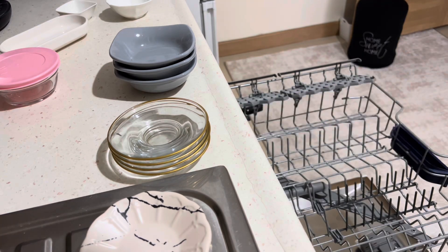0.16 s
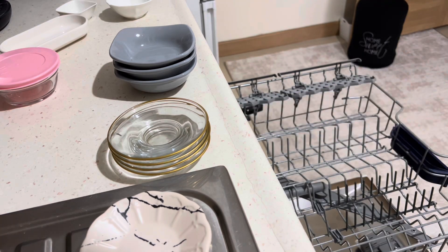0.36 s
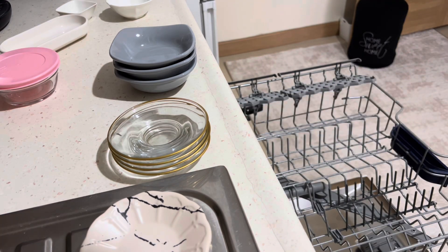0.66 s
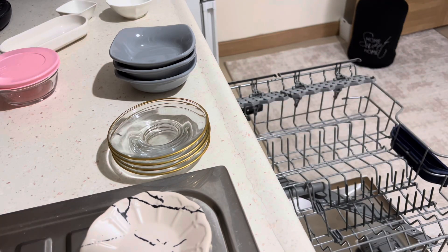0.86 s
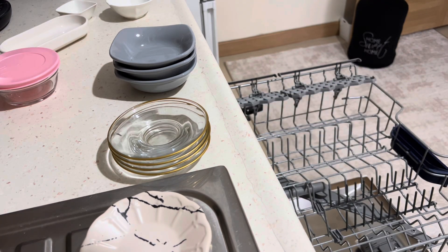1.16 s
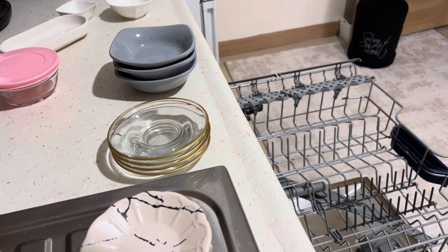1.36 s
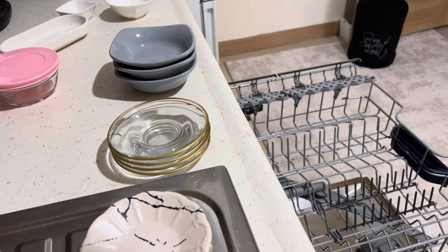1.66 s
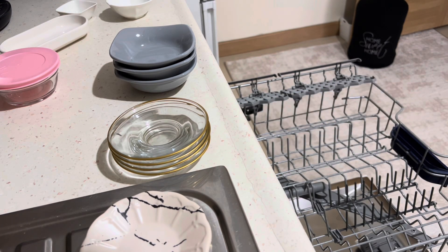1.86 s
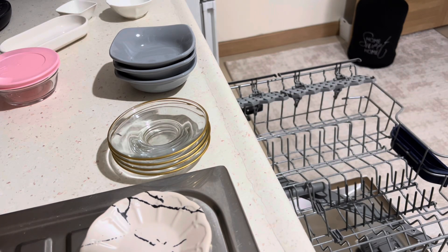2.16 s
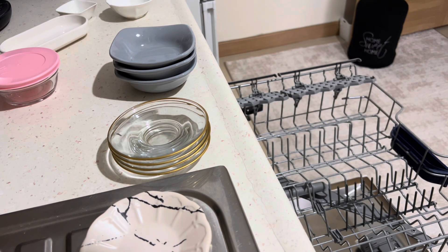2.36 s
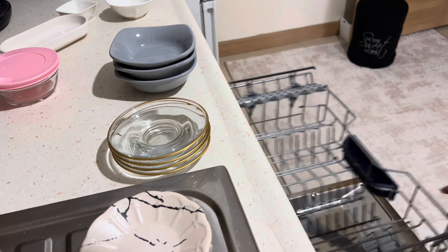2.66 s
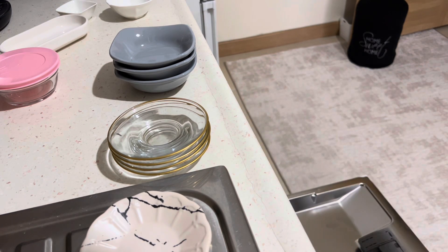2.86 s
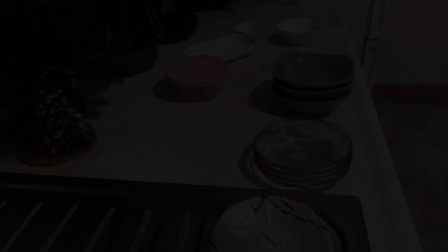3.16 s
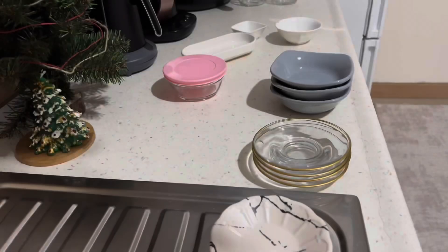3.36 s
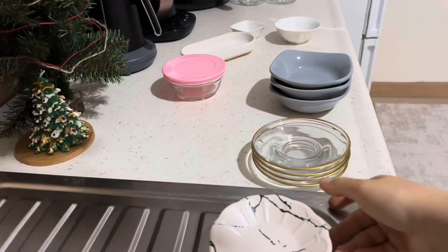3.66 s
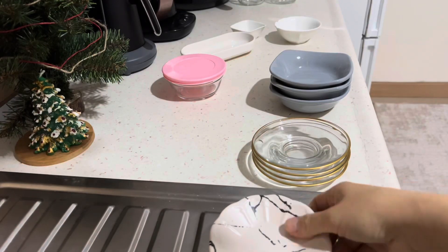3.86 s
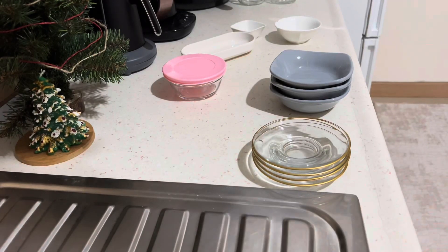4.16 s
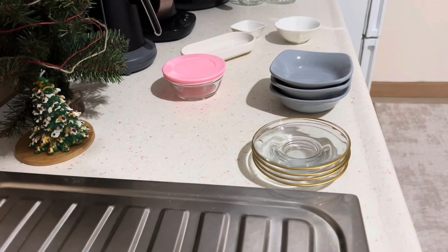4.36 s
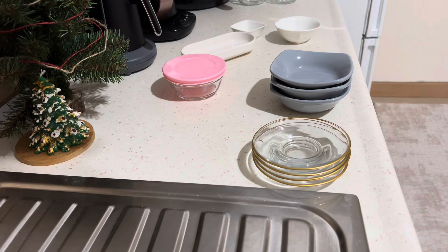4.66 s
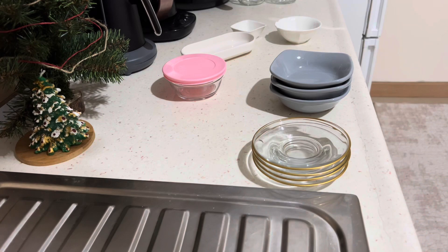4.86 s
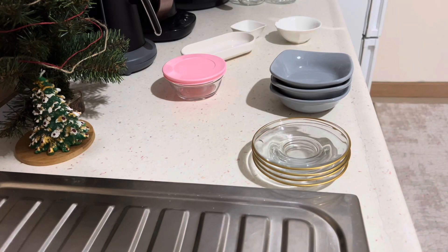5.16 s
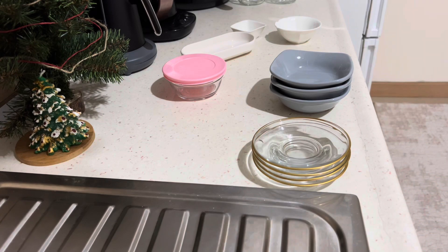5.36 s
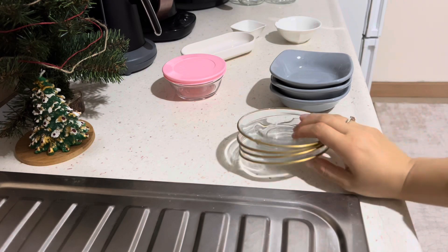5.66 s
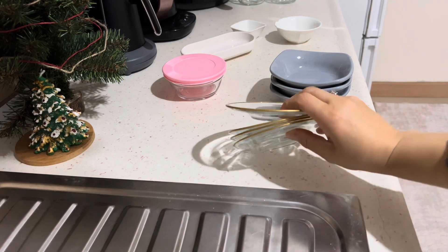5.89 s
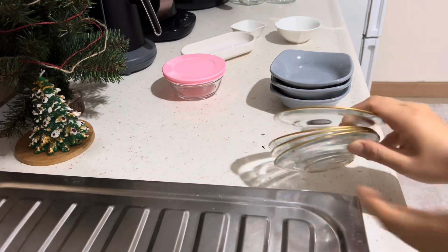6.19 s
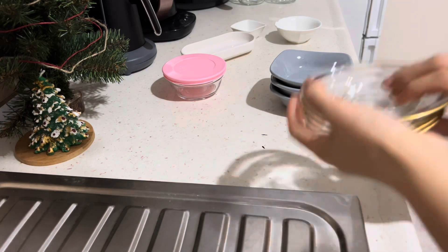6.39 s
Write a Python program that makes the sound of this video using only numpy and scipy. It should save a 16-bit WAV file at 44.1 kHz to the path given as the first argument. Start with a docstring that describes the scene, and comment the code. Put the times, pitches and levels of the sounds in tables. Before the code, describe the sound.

Close in a small hard kitchen over a faint low hum, a dishwasher's wire rack rattles in with loud, ringing metallic bursts. The door swings up with a soft rumble and thuds shut. After an abrupt cut, china plates knock and scrape on a steel drainer, then glass saucers clink and slide on a stone counter. Phone-like stereo pickup, short bright reverberation, no voice.

```python
"""Impact and friction in a small hard kitchen

A dishwasher's wire rack is shoved in and clatters, and its door swings up and thuds shut. After a cut, china
plates are lifted off a steel drainer and glass saucers slide and clink on a stone counter. Impacts are bursts
of noisy force that excite dense and clear modes; friction is uneven noise coloured by the body.
The room adds a diffuse tail over an unsteady hum, heard through the two microphone ports of a phone."""
import sys
import numpy as np
from scipy import signal
from scipy.fft import rfft, irfft
from scipy.io import wavfile
from scipy.ndimage import uniform_filter1d

SR = 44100
rng = np.random.default_rng(int(sys.argv[2]) if len(sys.argv) > 2 else 0)


def master(y):
    """Save y as 16-bit WAV."""
    cut = np.clip(np.atleast_2d(y).T, -1, 1)
    pcm = np.round(cut * 32767)  # scale
    wavfile.write(sys.argv[1], SR, pcm.astype(np.int16))


N = 287973
BLOCK = 1 << 14  # samples given to one blow

# Impacts, levels ahead of room and phone: (time [s], peak level at 1-6 kHz [dB],
# level below 1 kHz relative to that peak [dB], pitch favoured by the contact [Hz], chatter before decay [s])
RACK_BLOWS = [(0.8055, -8, -19.5, 2250, 0.02), (0.886, -20, -12, 2080, 0.0044),
              (0.897, -2, -53, 5050, 0.0038), (0.9083, -6, -21, 3500, 0.016),
              (0.9949, -10.5, -26, 5010, 0.013), (1.0197, -18, -14, 5180, 0.011),
              (1.1172, -22, -43, 1530, 0.005), (1.1787, -19.5, -19.5, 1984, 0.0052),
              (1.238, -35, -12, 1510, 0.003), (1.2917, -30.5, -17.5, 2200, 0.0032),
              (1.4641, -17, -19.5, 2520, 0.0025), (1.493, -13.5, -16, 2560, 0.015),
              (1.6065, -2.5, -33, 1500, 0.024), (1.6374, -3.5, -15, 2598, 0.014),
              (1.7948, -5.5, -10.5, 1700, 0.0082), (1.8250, -7, -8.5, 5680, 0.0098),
              (1.8520, -2.5, -16.5, 5570, 0.022), (1.8995, -8.5, -13.5, 1770, 0.011),
              (2.16, -48.5, -13, 3630, 0.014)]
DOOR_BLOWS = [(2.7742, -18.5, 3.5, 193, 0.035), (2.7974, -28, 3, 185, 0.0063),
              (2.935, -25, -0.5, 123, 0.0059), (2.9458, -13, 14, 154, 0.014),
              (3.1639, -25, -2, 2770, 0.0054)]
PLATE_BLOWS = [(3.9128, -8, -12, 1450, 0.0085), (3.928, -6, 3, 3980, 0.017),
               (4.3106, -34.5, -21, 2500, 0.028), (4.349, -11, -39, 7470, 0.0059),
               (4.386, -23, -51, 3350, 0.0091), (4.4703, -26.5, -25, 5600, 0.0044),
               (4.4865, -9, -46, 8630, 0.0043), (4.5005, -7.5, -52, 3540, 0.0026),
               (4.5643, -11.5, -42, 3274, 0.001), (4.5947, -11.5, -58, 2510, 0.0044),
               (4.8204, -6, -16.5, 1660, 0.011), (4.8846, -5.5, -49.5, 1310, 0.0015),
               (4.8994, -13.5, -20.5, 3860, 0.016), (4.934, -18.5, -27.5, 7040, .004),
               (4.9562, -17, -41, 1404, 0.0045), (4.9865, -27, -21, 3900, 0.0026),
               (5.0400, -26.5, -21.5, 2470, .003), (5.061, -15, -14.5, 1320, 0.008),
               (5.124, -33.5, -10, 1500, .003)]
GLASS_BLOWS = [(5.5513, -31, -4.5, 1520, 0.066), (5.6236, -22.5, -30, 5100, 0.019),
               (5.676, -4.5, -32, 6800, 0.0052), (5.6978, -2.5, -24.5, 7200, 0.0082),
               (5.7107, -4.5, -19, 7700, 0.0015), (5.8291, -13, -13.5, 3400, 0.0064),
               (5.914, -25.5, -5, 7240, 0.0026), (6.335, -23, -38, 5450, 0.014),
               (6.353, -23.5, -34, 8700, 0.0018), (6.4094, -7.5, -59, 8600, 0.001),
               (6.493, -25, -43, 5300, 0.014)]

# Rolling and sliding strokes: (start of full loudness [s], swell [s], hold [s], fade [s],
# level at 1-6 kHz [dB], relative level below 1 kHz [dB], relative level above 6 kHz [dB]);
# levels are at full loudness, for bands of unit rms, ahead of room and phone
RACK_ROLL = [(.106, 0.036, 0.0046, 0.04, -55.5, -29, 1), (.75, 0.045, 0.013, 0.13, -69, 5.5, -20),
             (1.04, 0.0063, 0.0039, 0.37, -39, -9.5, -3.5), (1.59, 0.15, 0.03, 0.0046, -43, -6, -0.5),
             (2.22, 0.043, 0.58, 0.051, -60.5, -12, -26)]
DOOR_SWING = [(2.575, 0.032, 0.12, 0.16, -53.5, 18.5, -15), (2.765, 0.14, 0.0022, 0.0038, -38.5, 9.1, -4),
              (2.87, 0.058, 0.059, 0.0043, -47, 15.8, -2), (3.02, 0.0046, .005, 0.14, -35, 4.6, -14.5)]
PLATE_SLIDE = [(3.732, 0.059, .005, 0.035, -57, -4, -4.5), (3.865, 0.0051, 0.012, 0.072, -47.5, -1.5, 2),
               (3.61, 0.0035, 0.12, 0.12, -73.5, -8, 14.5), (4.9, 0.0027, 0.019, 0.14, -19, -12.5, -11),
               (5.17, 0.26, 0.0039, 0.043, -34.5, -8, -23.5)]
GLASS_SLIDE = [(5.52, 0.0053, 0.02, 0.069, -60.5, 12.5, -10), (5.94, 0.027, 0.035, 0.14, -43, -1.5, -14),
               (6.09, 0.021, 0.061, 0.02, -43, 4.1, -29), (6.18, 0.093, 0.12, 0.022, -37, 5.9, -11.5)]
SWELL_DB = 20  # middle-band change over one swell or fade time

# Clear modes of each body when struck: (frequency [Hz], relative level [dB], decay by 60 dB [s])
RACK_MODES = [(1480, -8, .08), (1776, -2, .14), (2089, -6, .06), (2513, -6, .03), (3330, -8, .025),
              (4982, 0, .17), (5127, -4, .2), (5454, -2, .14), (5572, 0, .19), (5755, -3, .13)]
DOOR_MODES = [(154, 3, .2), (196, -1, .25), (221, -5, .25), (323, -12, .2), (616, -9, .15), (720, -10, .15)]
PLATE_MODES = [(323, -16, .1), (720, -20, .07), (1450, -6, .025), (3330, -5, .04), (3830, -3, .06),
               (4086, 3, .1), (7300, -3, .06), (9160, -3, .07), (12330, 0, .05), (12800, 2, .06),
               (13340, 0, .04)]
GLASS_MODES = [(690, -14, .06), (1550, -10, .03), (2300, -4, .05), (3400, -4, .05), (5250, -6, .08),
               (6580, -1, .1), (7219, 0, .06), (13230, -3, .06)]

# Dense modes blurred into a colour: (frequency [Hz], relative spectral level [dB per Hz])
RACK_BODY = [(80, -38.5), (192, -3.5), (797, -27.5), (1470, 2), (4700, -0.5), (6250, -2.5), (13700, -11)]
DOOR_BODY = [(60, -47), (151, 0.5), (230, -4.5), (390, -14.5), (720, -13), (1100, -26), (4730, -23),
             (13400, -34.5)]
PLATE_BODY = [(130, -8), (310, -6), (482, -18), (699, -11.5), (950, -20), (1500, -5), (4000, 4),
              (5240, -1.5), (8700, -4.5), (10600, -10), (13200, -8.5)]
GLASS_BODY = [(80, -36), (145, -2), (387, -18), (715, -37), (1320, -12.5), (5850, -5), (6670, 6),
              (13400, 2)]
DRAINER_BODY = [(150, -32.5), (316, -11), (1020, -16.5), (1330, 0.5), (2600, -2), (5360, -14.5),
                (13200, -18)]
COUNTER_BODY = [(100, -15), (149, -9.5), (387, -15.5), (480, -2.5), (720, -7), (1000, -18.5), (1750, -28),
                (2050, -19), (2310, -11.5), (2800, -24), (5600, -22.5), (14500, -28)]

# How an impact follows its pitch: (level above 6 kHz at the middle pitch, relative to 1-6 kHz [dB],
# its slope [dB per octave], ring level at the middle pitch [dB], its slope [dB per octave])
RACK_LAW = (-11.5, -1.7, -3.5, 8)
DOOR_LAW = (-15.5, -3.5, -3, 1.5)
PLATE_LAW = (1, 2.5, -11.5, 0.3)
GLASS_LAW = (-4, 6, -17.5, 3)
MIDDLE_HZ = 3500

# Colour of the background hum: (frequency [Hz], relative spectral level [dB per Hz])
HUM_COLOUR = [(18, -60), (30, -38.5), (147, -5.5), (274, -18), (346, -22), (1090, -27.5), (1440, -27),
              (7060, -34), (15000, -42.5)]
# Slow changes of the hum, added to its base level: (time [s], level [dB])
HUM_SWELL = [(0, 15), (.15, 8.5), (3.2, 15), (3.3, 9), (3.6, 4), (3.8, 16), (5.3, 6.5), (6.53, 14)]
HUM_DB = -74.5  # base rms level, ahead of the swell

# Decay of the diffuse tail: (frequency [Hz], decay by 60 dB [s])
ROOM_T60 = [(100, 0.13), (500, 0.41), (2000, 0.26), (6000, 0.21), (14000, 0.22)]
# Standing waves, scaled along with the tail by ROOM_DB: (frequency [Hz], relative level [dB], decay by 60 dB [s])
ROOM_BOOM = [(154., -46, .2), (195., -43, .25)]
ROOM_DB = -9.5

# Treble response of the microphone ports: (frequency [Hz], gain [dB])
PORT_TREBLE = [(7700, 0), (8400, -5), (9100, 2.5), (10800, -5), (11800, 2), (13800, 2), (14500, -12),
               (15500, -11.5)]
TOP_HZ = 15600  # upper limit of the phone
CUT_S, CUT_FADE_S = 3.19, 0.018  # start and length of the fade at the cut


def undb(db):
    """Definition of the decibel: amplitude is ten to the power of level over 20."""
    return 10 ** (np.asarray(db) / 20)


def colour(table, hz):
    """Spectral envelope: the second column, interpolated on a log-frequency axis."""
    frequency, value = np.array(table)[:, 0], np.array(table)[:, 1]
    return np.interp(np.log(hz + 1), np.log(frequency), value)


def thirds(hz):
    """Band splitting: soft middle, low and high bands; the low band falls away steeply below about 120 Hz."""
    below_1k = 1 / (1 + (hz / 1000) ** 8)
    radiation = hz ** 8 / (hz ** 8 + 120.0 ** 8)
    low = below_1k * radiation
    high = 1 - 1 / (1 + (hz / 6000) ** 16)
    middle = (hz > 300) * (1 - low - high)
    return np.array([middle, low, high])


def resonate(modes, hz):
    """Modal resonance: each mode answers an impulse as a decaying sine that starts at its listed level."""
    f, db, t60 = np.transpose(modes)[:, :, None]
    s = 2j * np.pi * hz + np.log(1000) / np.maximum(t60, 0.01)
    omega = 2 * np.pi * f
    return undb(db) * omega / (s * s + omega ** 2)


def gritty(shape, scatter_db):
    """Random contact: noise from micro-contacts of very uneven size."""
    size = np.minimum(rng.exponential(size=shape[-1]), 5)
    return rng.standard_normal(shape) * undb(scatter_db * size)


def ports(spectra, hz, lag_ms, alike, pan_db=0):
    """Interaural coherence: two draws are shared in the bass and partly unrelated above.
    The left lags by lag_ms and, above the bass, is pan_db louder; negative values reverse this."""
    share = 1 - (1 - np.clip(alike, 0, 1)) * np.minimum(hz / 1200, 1) ** 2
    mid = np.sqrt((1 + share) / 2) * spectra[0]
    side = np.sqrt((1 - share) / 2) * spectra[1]
    turn = np.exp(-1j * np.pi * hz * lag_ms / 1000)  # half the lag on each port
    turn = turn * undb(pan_db / 2 * np.minimum(hz / 700, 1))
    turn = turn * undb(0.32 * np.minimum(hz / 10000, 1) ** 2)  # the left port is the brighter
    return np.array([(mid + side) * turn, (mid - side) / turn])


def hum():
    """Filtered noise: a low rumble of wavering level under faint hiss, swelling slowly."""
    hz, t = np.fft.rfftfreq(N, 1 / SR), np.arange(N) / SR
    noise = ports(rfft(rng.standard_normal((2, N))), hz, 0, 0.13) * undb(colour(HUM_COLOUR, hz))
    waver_db = 0.83 * np.interp(t, np.arange(64) / 9, rng.standard_normal(64))  # 9 points a second
    low = 1 / (1 + (hz / 330) ** 8)
    rumble = irfft(noise * low, N) * undb(waver_db)
    hiss = irfft(noise * (1 - low), N)
    out = rumble + hiss
    return out / out.std() * undb(HUM_DB + np.interp(t, *np.transpose(HUM_SWELL)))


def rub(rows, body, modes, ring_db, lag_ms, pan_db, grit_db, bass_follows, treble_follows):
    """Friction: small uneven slips excite the body, while contact damps the clear modes to a tint.
    As the pressure eases, bass and treble follow the loss in dB by their own share."""
    hz, t = np.fft.rfftfreq(N, 1 / SR), np.arange(N) / SR
    judder = undb(4.5 * np.interp(t, np.arange(400) / 60, rng.standard_normal(400)))  # 60 points a second
    force = rfft(gritty((2, N), grit_db) * judder)
    slips = ports(force, hz, lag_ms, 0.55, pan_db) * undb(colour(body, hz))
    damped = np.array(modes) * [1, 1, 0.3]
    tint = abs(resonate(damped, hz)).sum(axis=0)
    slips = slips * (1 + undb(ring_db) * tint / tint.max())
    gain = 0
    for s, swell_s, hold_s, fade_s, db, low_db, high_db in rows:
        before = np.maximum(s - t, 0) / swell_s
        after = np.maximum(t - s - hold_s, 0) / fade_s
        loss = SWELL_DB * (before + after)
        level = db + np.array([[0], [low_db], [high_db]])
        gain = gain + undb(level - np.outer([1, bass_follows, treble_follows], loss))
    parts = irfft(slips * thirds(hz)[:, None], N)
    parts = parts / parts.std(axis=(1, 2), keepdims=True)
    return np.sum(parts * uniform_filter1d(gain, size=300)[:, None], axis=0)


def crowd(body, hz, count, t60):
    """Modal density: many brief modes of touching pieces, drawn anew at each blow, under the body's colour."""
    f = 900 * 2 ** (4 * rng.random(count))  # four octaves
    modes = np.c_[f, rng.normal(0, 4, count), np.full(count, t60)]
    response = resonate(modes, hz).sum(axis=0)
    return undb(colour(body, hz)) * (1 + 0.7 * response / np.sqrt(np.mean(abs(response) ** 2)))


def blows(rows, law, modes, body, lag_ms, pan_db, die_s, reach_oct, detune, far_db):
    """Impact excitation: a briefly chattering force shakes the dense body and rings modes near its pitch.
    die_s is the decay constant of the force; modes reach_oct away ring 12 dB weaker, far_db at most."""
    out, t, hz = np.zeros((2, N + BLOCK)), np.arange(BLOCK) / SR, np.fft.rfftfreq(BLOCK, 1 / SR)
    bands, modes = thirds(hz), np.array(modes)
    for s, db, low_db, pitch, chatter_s in rows:
        octaves = np.log2(pitch / MIDDLE_HZ)
        high_db, ring_db = law[0] + law[1] * octaves, law[2] + law[3] * octaves

        push = (1 - np.exp(-t / 0.00092)) * np.exp(-np.maximum(t - chatter_s, 0) / die_s)
        push = push * (1 + 0.25 * np.exp(-t / 0.0022))  # extra weight on the first touch
        force = rfft(gritty((2, BLOCK), 4) * push)

        dense = crowd(body, hz, count=40, t60=0.023)
        dense = dense * undb(6.0 * np.exp(-(np.log2((hz + 1) / pitch) / 0.22) ** 2))
        # a small hard contact hardly moves the body far below its pitch
        dense = dense * undb(-6.0 * np.clip(np.log2(pitch / (hz + 1)) - 0.7, 0, 2))

        # neighbours that touch shift the modes a little from blow to blow
        shift = 1 + detune * rng.standard_normal(len(modes))
        shifted = modes * np.c_[shift, np.ones((len(modes), 2))]
        distance = np.log2(modes[:, 0] / pitch) / reach_oct
        ring = undb(-np.minimum(12 * distance ** 2, far_db)) @ resonate(shifted, hz)
        ring = ring * np.sqrt(np.sum(abs(dense) ** 2) / np.sum(abs(ring) ** 2))

        # the first touch starts the ring, the chatter roughens it
        ring_force = np.sqrt(np.mean(abs(force) ** 2)) + 0.5 * force
        struck = force * dense + ring_force * undb(ring_db) * ring
        parts = irfft(ports(struck, hz, lag_ms, 0.3, pan_db) * bands[:, None])
        power = uniform_filter1d(np.mean(parts ** 2, axis=1), size=128)
        peaks = np.sqrt(2 * power.max(axis=1))  # peak of the smoothed envelope
        sound = np.tensordot(undb(db + np.array([0, low_db, high_db])) / peaks, parts, 1)
        i = int(s * SR)
        out[:, i:i + BLOCK] += sound * np.clip(4 * (0.9 - t / t[-1]), 0, 1)  # fade the end of the block
    return out[:, :N]


def rack():
    """Rolling and wire resonance: the rack rolls in and its struck wires ring in narrow clear modes."""
    clatter = blows(RACK_BLOWS, RACK_LAW, RACK_MODES, RACK_BODY, lag_ms=0.25, pan_db=2.5,
                    die_s=0.012, reach_oct=0.06, detune=0.001, far_db=40)
    roll = rub(RACK_ROLL, RACK_BODY, RACK_MODES, ring_db=5.8, lag_ms=0.3, pan_db=2.5,
               grit_db=4.5, bass_follows=0.89, treble_follows=1.0)
    return clatter + roll


def room(dry):
    """Reverberation: a diffuse tail unrelated at the two ports, and two standing waves with the same response at both."""
    hz, t, cells = signal.stft(rng.standard_normal((2, SR // 2)), SR, nperseg=256)
    decay_db = -60 * t / colour(ROOM_T60, hz)[:, None]
    tail = signal.istft(cells * undb(decay_db), SR)[1]
    t = np.arange(tail.shape[1]) / SR
    tail = tail * (1 - np.exp(-t / 0.0098))  # the diffuse field builds up
    boom = sum(undb(db - 60 * t / t60) * np.sin(2 * np.pi * f * t) for f, db, t60 in ROOM_BOOM)
    response = tail / np.linalg.norm(tail[0]) + boom
    return dry + undb(ROOM_DB) * signal.fftconvolve(dry, response, axes=1)[:, :N]


def door():
    """Panel resonance: the door swings with a low rumble and thuds in its low modes."""
    thuds = blows(DOOR_BLOWS, DOOR_LAW, DOOR_MODES, DOOR_BODY, lag_ms=0.038, pan_db=0.3,
                  die_s=0.021, reach_oct=3.0, detune=0, far_db=13)
    swing = rub(DOOR_SWING, DOOR_BODY, DOOR_MODES, ring_db=3, lag_ms=0.058, pan_db=0.3,
                grit_db=1.106, bass_follows=1.0, treble_follows=0.36)
    return thuds + swing


def plates():
    """Impact and friction of china: plates knock together and scrape on the steel drainer's body."""
    knocks = blows(PLATE_BLOWS, PLATE_LAW, PLATE_MODES, PLATE_BODY, lag_ms=-0.27, pan_db=1.3,
                   die_s=0.01, reach_oct=0.44, detune=0.008, far_db=11.8)
    slide = rub(PLATE_SLIDE, DRAINER_BODY, PLATE_MODES, ring_db=6.6, lag_ms=-0.091, pan_db=2.5,
                grit_db=4.5, bass_follows=0.83, treble_follows=1.73)
    return knocks + slide


def glass():
    """Impact and friction of glass: stacked saucers clink and slide on the stone counter's body."""
    clinks = blows(GLASS_BLOWS, GLASS_LAW, GLASS_MODES, GLASS_BODY, lag_ms=-0.091, pan_db=0.48,
                   die_s=0.0091, reach_oct=0.39, detune=0.0096, far_db=17)
    slide = rub(GLASS_SLIDE, COUNTER_BODY, GLASS_MODES, ring_db=3.7, lag_ms=-0.12, pan_db=0.47,
                grit_db=3.7, bass_follows=0.95, treble_follows=0.6)
    return clinks + slide


def scene():
    """Superposition: rack and door with their reverberation end at the cut; plates, glass and hum add."""
    dishwasher = room(rack() + door())
    dishes = room(plates() + glass())
    t = np.arange(N) / SR
    before_cut = np.clip((CUT_S + CUT_FADE_S - t) / CUT_FADE_S, 0, 1)
    return dishwasher * before_cut + dishes + hum()


def record(dry):
    """Transducer response: the ports colour the treble; the phone clips peaks, drops deep bass and cuts the top."""
    port_gain = undb(colour(PORT_TREBLE, np.fft.rfftfreq(N, 1 / SR)))
    heard = np.clip(irfft(rfft(dry) * port_gain, N), -1, 1)
    heard = signal.sosfilt(signal.butter(1, 60, "high", fs=SR, output="sos"), heard)
    return signal.sosfilt(signal.ellip(8, 0.2, 60, TOP_HZ, fs=SR, output="sos"), heard)


dry = scene()
out = record(dry)
master(out)
```